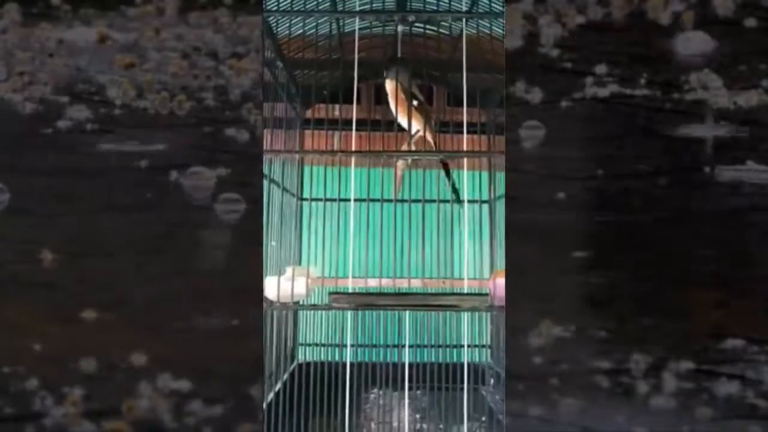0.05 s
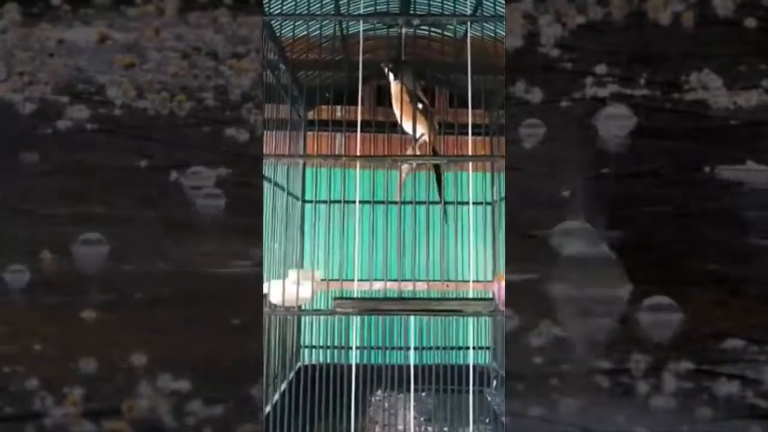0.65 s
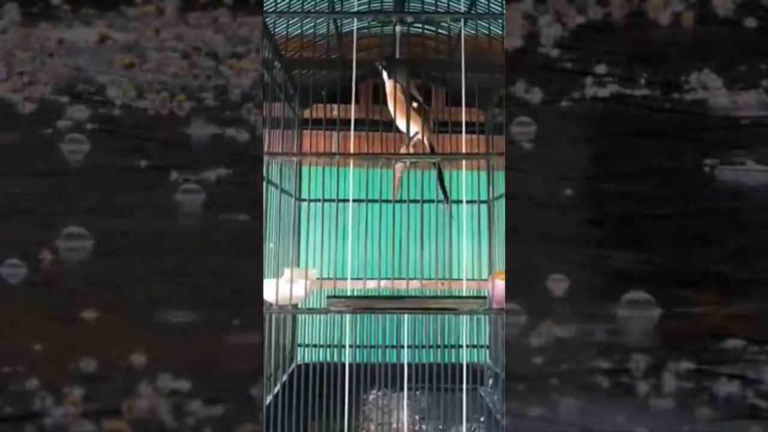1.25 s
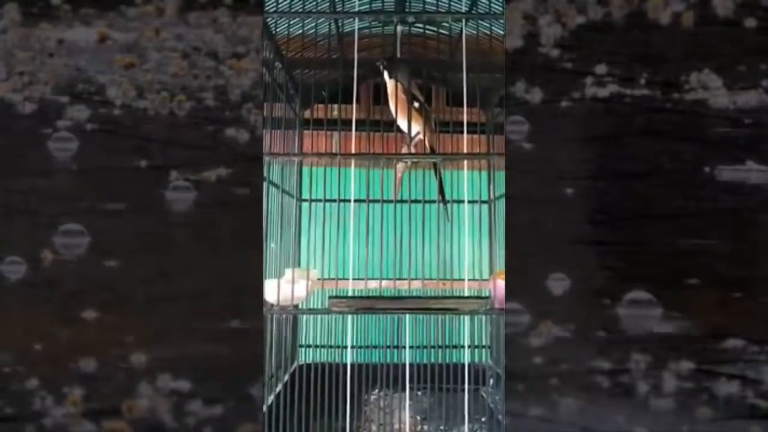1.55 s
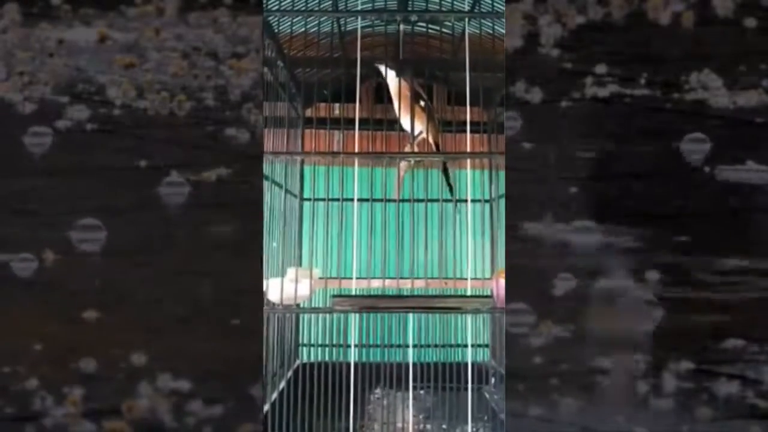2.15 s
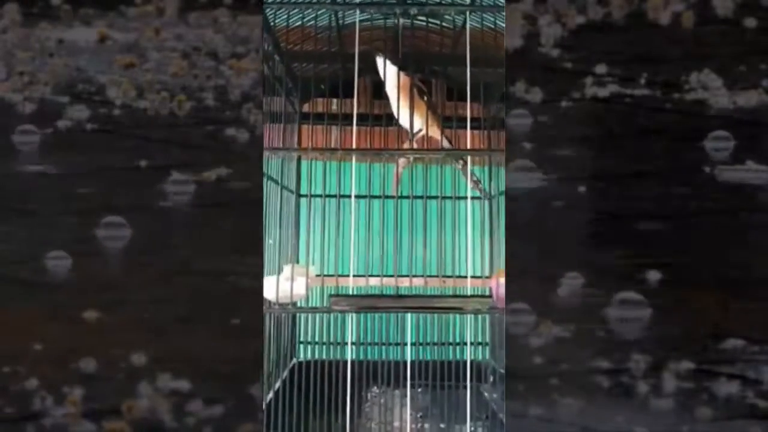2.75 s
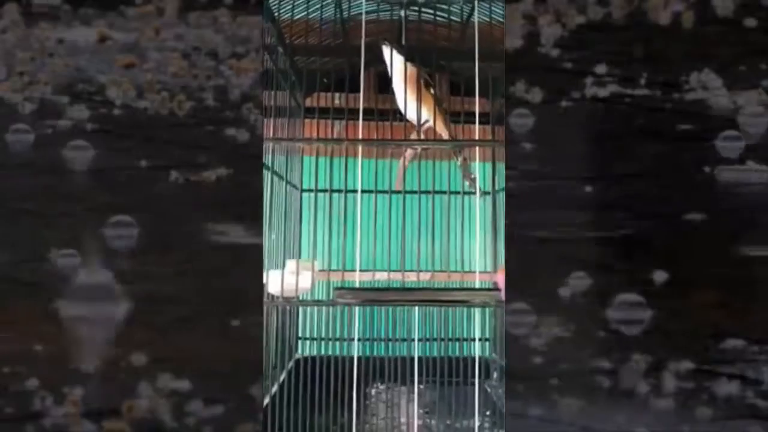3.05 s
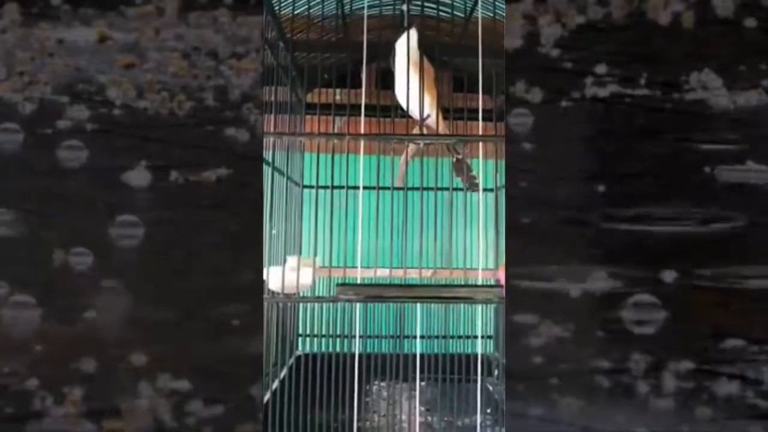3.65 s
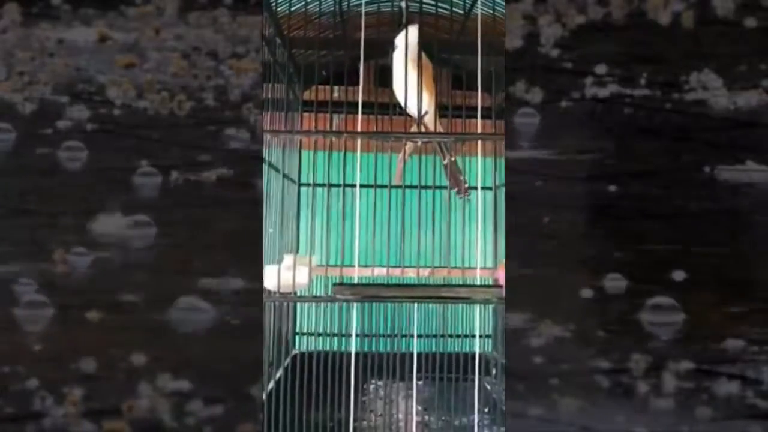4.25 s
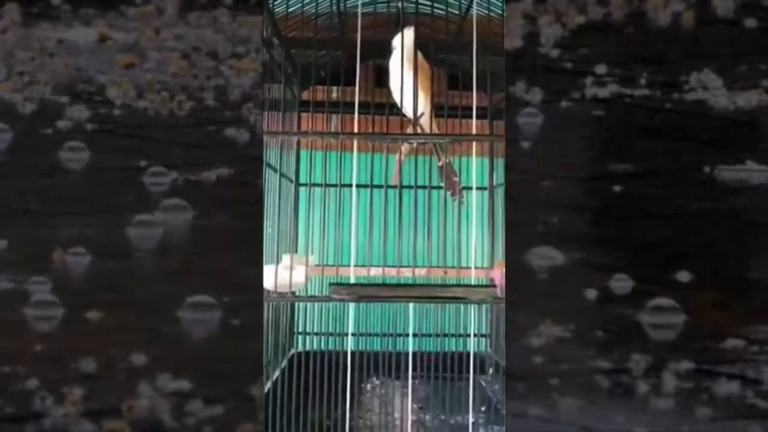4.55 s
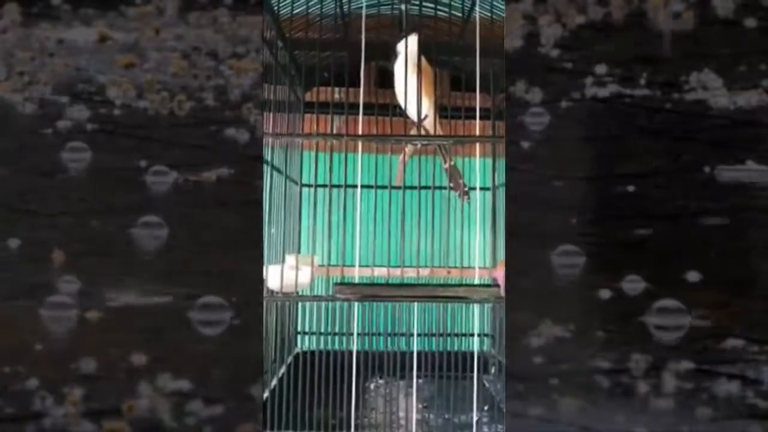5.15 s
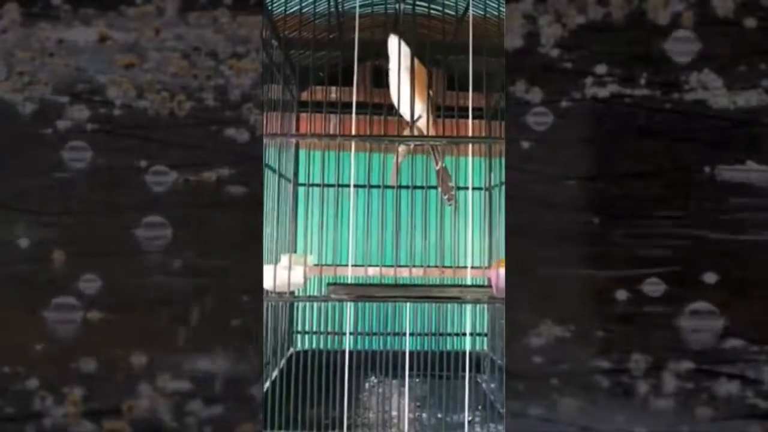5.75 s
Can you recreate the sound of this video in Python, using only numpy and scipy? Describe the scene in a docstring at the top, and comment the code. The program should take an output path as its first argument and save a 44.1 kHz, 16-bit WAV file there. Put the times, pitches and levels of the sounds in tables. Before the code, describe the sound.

Close, loud birdsong from a cage, switching quickly between screeches, chirp runs, whistles and a rolling trill, with a soft outdoor wash behind.

```python
"""Caged shrike, close up

A shrike sings loudly at the microphone: harsh screeches trailed by dry rasps, runs of arched chirps,
falling whistles and a rolling trill of sharp chips. Its voice roughens with turbulent air and splits
into extra lines as its cycles alternate. Nearby walls throw the song back over a steady outdoor wash,
and the loudest notes overload the recorder."""
import sys
import numpy as np
from scipy import signal
from scipy.fft import rfft, irfft
from scipy.io import wavfile
from scipy.ndimage import uniform_filter1d

SR = 44100
rng = np.random.default_rng(int(sys.argv[2]) if len(sys.argv) > 2 else 0)


def dump_mix(stems):
    """Bounce the given channels to the path in sys.argv[1] as a 16-bit WAV at rate SR."""
    frames = np.atleast_2d(stems).T  # one column per channel
    limited = np.clip(frames, -1, 1)  # hard clip at full scale
    pcm = np.round(limited * 32767).astype(np.int16)
    wavfile.write(sys.argv[1], SR, pcm)


N = 264600

# Colour of the outdoor wash. Each row: frequency in Hz, noise density in dB.
WASH_COLOUR = [(25, -46), (60, -10.5), (130, -14.5), (185, 1.5), (330, 1), (600, -2.5), (1000, -0.5),
               (1600, 2.5), (2500, 4.5), (3300, 1), (4700, -9.5), (8000, -16.5), (14000, -19.5),
               (15500, -22)]
# Stereo width of the wash. Each row: frequency in Hz, left-right likeness from 0 to 1.
WASH_LIKENESS = [(50, 0.74), (200, 1), (400, 0.8), (800, 0.28), (2000, 0.056), (10000, 0.41)]
# Fader rides on the wash. Each row: time in seconds, roar and hiss in dB before their trims.
WASH_RIDES = [(0.0, -31, -30), (0.35, -31, -28.5), (0.8, -32.5, -37), (1.52, -33, -38), (1.92, -36, -40),
              (3.06, -34.5, -40), (3.48, -36, -43), (4.16, -37, -43), (5.48, -30.5, -33.5),
              (6.0, -28.5, -31)]
# Screeches. Each row: start, length and attack in seconds, level in dB, time to the break in seconds,
# level after it in dB, start and end pitch in Hz, roughness from 0 to 1, quarter lines before it in dB.
SCREECH_NOTES = [ (.020, 0.15, 0.023, -4.5, 0.08, -14.5, 4030, 4810, 0.57, -5.5),
                 (.603, 0.16, 0.022, -3, 0.083, -16, 3927, 4666, 0.31, -11),
                 (1.895, 0.084, 0.041, -7, 0.11, 1, 3610, 5184, 0.72, -6),
                 (3.946, .140, 0.031, 0, 0.068, -13, 4073, 4813, 0.47, -10.5),
                 (4.530, .150, 0.019, -2.5, 0.071, -12.5, 3950, 4757, 0.32, -12),
                 (4.964, .165, 0.024, -.5, 0.084, -15.5, 3960, 4730, 0.3, -13.5)]
# Dry rasps. Each row: start and length in seconds, level in dB, pitch of the fifth line in Hz.
RASP_NOTES = [ (.192, 0.047, -15, 5530), (.318, 0.04, -11.5, 5540), (.762, 0.047, -17.5, 5380),
              (.797, 0.022, -14, 5120), (.861, 0.033, -12.5, 5400), (2.349, 0.028, -15.5, 5350),
              (2.576, 0.022, -14.5, 5500), (4.122, 0.042, -11.5, 6250), (4.24, 0.0504, -12, 5886),
              (4.698, 0.059, -15, 5410), (4.787, 0.036, -11, 5805), (5.145, 0.038, -14.5, 6270),
              (5.229, 0.041, -13.5, 5740)]
# Chirps. Each row: start and length in seconds, level in dB, top pitch in Hz, relative roughness.
CHIRP_NOTES = [ (1.025, 0.0101, -11.5, 4780, 0.25), (1.031, 0.0097, -13, 3930, 0.4),
               (1.209, 0.015, -8, 4640, 0.25), (1.269, 0.023, -10.5, 4584, .3),
               (1.335, 0.021, -9.5, 4520, 0.07), (1.396, 0.025, -15, 4380, 0.35),
               (1.463, 0.023, -9.5, 4400, 0.16), (1.525, 0.03, -14, 4034, 0.53),
               (1.592, 0.03, -16, 3770, 0.3), (1.657, 0.042, -23, 3206, .7),
               (2.057, 0.026, -12, 3780, 0.13), (2.652, 0.028, -15.5, 4250, 0.39),
               (2.726, 0.019, -10.5, 4363, 0.37), (2.792, 0.024, -9, 4437, 0.26),
               (2.86, 0.014, -5, 4040, 0.24), (2.929, 0.016, -6.5, 4140, .3),
               (5.393, 0.021, -12, 3930, 0.68), (5.608, 0.0177, -9, 4750, 0.14),
               (5.683, 0.011, -6, 4670, 0.14), (5.748, 0.015, -8, 4515, 0.14),
               (5.815, 0.018, -6.5, 4520, 0.16), (5.879, 0.018, -8, 4320, 0.24),
               (5.948, 0.025, -12, 4150, 0.14)]
# Whistles. Each row: start, length and attack in seconds, level in dB, start and resting pitch in Hz,
# fall time in seconds, opening roughness from 0 to 1.
WHISTLE_NOTES = [ (1.056, 0.097, 0.012, -11, 3650, 3173, .016, 0.42),
                 (2.185, 0.13, 0.037, -5, 5996, 3240, .034, 0.44),
                 (2.436, 0.11, 0.031, -7, 5780, 2680, 0.034, 0.71),
                 (5.422, 0.068, 0.0079, -8.5, 3490, 3256, 0.0292, 0.41)]
# Chips of the trill. Each row: start and length in seconds, level in dB, pitch near the bottom of
# the dip and end pitch in Hz, opening roughness from 0 to 1.
TRILL_NOTES = [ (3.006, 0.014, -4, 3380, 4660, 0.68), (3.080, 0.02, -1, 3570, 4760, 0.34),
               (3.161, 0.022, -2.5, 3520, 4850, 0.49), (3.242, 0.023, -3, 3580, 4900, 0.51),
               (3.324, .025, -3, 3680, 5000, 0.54), (3.405, 0.017, -2, 3936, 5070, 0.53),
               (3.490, .023, -2.5, 3600, 5110, 0.55), (3.569, 0.02, -1.5, 3680, 5000, 0.55),
               (3.657, 0.019, -2, 3654, 5046, 0.81), (3.763, 0.0151, -6, 3557, 4135, 0.56)]
# The voice's overtones, then the lines from cycles alternating in twos, and in fours and eights.
# Each row: multiple of the pitch, relative level in dB.
OVERTONE_PARTIALS = [(2, -18.5), (3, -25.5)]
HALF_PARTIALS = [(1 / 2, 7), (3 / 2, -3.6)]
QUARTER_PARTIALS = [(3 / 4, 0), (7 / 8, -2), (5 / 4, -6), (7 / 4, -18), (5 / 2, -30), (11 / 4, -28)]
# What windpipe and beak pass of each partial. Each row: frequency in Hz, gain in dB.
TRACT_EQ = [(1500, -12), (2000, 0), (2350, 9.5), (2800, 4), (3500, 3), (4400, 6), (5400, 14), (6500, -1),
            (8000, 5), (9500, -6), (12000, 11.5), (15500, -22)]
# Turbulent air in the throat, and with the beak wide. Each row: frequency in Hz, noise density in dB.
THROAT_COLOUR = [(1000, -75), (1700, -31), (1920, -60), (2290, -63), (2510, 9.5), (2830, 5.5), (3500, 7),
                 (3770, -5), (4050, 6.5), (4700, 7), (5710, 4), (7530, 0), (9580, -8.5), (12400, -8.5),
                 (15500, -13.5)]
BEAK_COLOUR = [(940, -14), (1600, -1), (2010, 1), (2230, 4.5), (2830, -5.5), (3390, 0), (3950, 4),
               (4510, 7), (5250, 6.5), (5610, 12.5), (6350, 5), (7600, -10.5), (14500, -15), (15500, -38)]
# Slaps off near surfaces. Each row: delay in milliseconds, left gain, right gain.
WALL_SLAPS = [(1.904, 0.39, -0.0038), (3.6766, -0.13, 0.86), (6.301, 0.6, -0.083), (8.36, 0.25, -0.15),
              (11.82, -0.3, 0.22), (16.5, 0.17, -0.053), (23.88, 0.17, 0.0014)]
# Ring of the surroundings. Each row: frequency in Hz, seconds to fall by 60 dB.
TAIL_DECAY = [(500, 0.11), (3000, 0.72), (5000, 0.55), (8000, 0.58), (14000, 0.49)]
# Stereo lean of the song. Each row: frequency in Hz, left minus right level in dB.
SONG_PAN = [(2200, 0), (3200, 1.4), (4500, 2), (7500, -1.2), (9000, -.5), (12000, -2.5)]

BAND_LIMIT_HZ = 15700


def amp(db):
    """Decibels to gain."""
    return 10 ** (np.asarray(db) / 20)


def unit_rms(x):
    """Scales to rms 1."""
    return x / np.sqrt(np.mean(x ** 2) + 1e-20)


def curve_at(points, hz):
    """Reads a (Hz, value) table on a log-frequency axis."""
    f, value = np.transpose(points)
    return np.interp(np.log(hz + 1), np.log(f + 1), value)


def add(mix, start, sound):
    """Mixes a sound in at its start in seconds."""
    part = mix[round(start * SR):][:len(sound)]
    part += sound[:len(part)]


def coloured_noise(colour, size):
    """Noise of rms 1 with the given spectrum."""
    gain = amp(curve_at(colour, np.fft.rfftfreq(16384, 1 / SR)))
    return unit_rms(irfft(rfft(rng.standard_normal(16384)) * gain)[:size])


def wobble(top_hz, size):
    """Smooth random motion, rolled off above top_hz."""
    rolloff = 1 + (np.fft.rfftfreq(16384, 1 / SR) / top_hz) ** 4
    return unit_rms(irfft(rfft(rng.standard_normal(16384)) / rolloff))[:size]


def note_shape(t, attack_s, onset_db, release_s):
    """A soft start, a swell from onset_db to full level, and a release."""
    edges = np.clip(np.minimum(t / 0.001, (t[-1] - t) / release_s), 0, 1)
    return edges * amp(onset_db * np.maximum(1 - t / attack_s, 0))


def outdoor_wash(roar_trim_db=1, hiss_trim_db=6.5, split_hz=850):
    """The distant outdoor bed: a low roar and a wider hiss, each drifting slowly in level."""
    frames, hz = N // 256 + 5, np.fft.rfftfreq(1024, 1 / SR)
    a, b, c, d, patches = rng.standard_normal((frames, len(hz), 5)).T
    likeness = np.clip(curve_at(WASH_LIKENESS, hz), -1, 1)[:, None]
    left = a + 1j * b
    right = likeness * left + np.sqrt(1 - likeness ** 2) * (c + 1j * d)
    patches = uniform_filter1d(uniform_filter1d(patches, size=14, axis=0), size=4, axis=1)
    colour = amp(curve_at(WASH_COLOUR, hz)[:, None] + 2.2 * unit_rms(patches))
    noise = signal.istft(np.array([left, right]) * colour, nperseg=1024, noverlap=768)[1][:, :N]
    low = signal.sosfiltfilt(signal.butter(2, split_hz, fs=SR, output="sos"), noise)
    times, roar_db, hiss_db = np.transpose(WASH_RIDES)
    t = np.arange(N) / SR
    roar = unit_rms(low) * amp(roar_trim_db + np.interp(t, times, roar_db))
    hiss = unit_rms(noise - low) * amp(hiss_trim_db + np.interp(t, times, hiss_db))
    return roar + hiss


def syrinx(hz, rough, half_db, bright_db, air, jitter, jitter_hz=650, quarter_db=None,
           flutter=0.52, flutter_hz=450):
    """The voice: a tone, overtones and lines of alternating cycles; roughness shakes it and adds air."""
    size, rough = len(hz), np.clip(rough, 0, 1)
    phase = 2 * np.pi * np.cumsum(hz * (1 + jitter * rough * wobble(jitter_hz, size))) / SR
    families = [([(1, 0)], 0), (OVERTONE_PARTIALS, bright_db), (HALF_PARTIALS, half_db)]
    if quarter_db is not None:
        families.append((QUARTER_PARTIALS, quarter_db))
    tone = np.zeros(size)
    for lines, family_db in families:
        for k, db in lines:
            beak_db = bright_db if 1 < k < 2 else 0  # a wider beak lets the upper lines out as well
            gain = amp(db + family_db + beak_db + curve_at(TRACT_EQ, k * hz))
            tone += gain * np.sin(k * phase) * (k * hz < BAND_LIMIT_HZ)
    air_share = np.clip(air * rough ** 2, 0, 1)
    breath = np.sqrt(air_share) * coloured_noise(THROAT_COLOUR, size)
    voice = np.sqrt(1 - air_share) * unit_rms(tone) + breath
    return unit_rms(voice * np.exp(flutter * rough * wobble(flutter_hz, size)))


def beak_notches(voice):
    """In harsh notes the open beak cancels two bands, setting the main lines apart."""
    for hz, width_hz in ((2800, 450), (5500, 1100)):
        voice = signal.lfilter(*signal.iirnotch(hz, hz / width_hz, fs=SR), voice)
    return unit_rms(voice)


def screech(start, length, attack_s, db, break_s, hoarse_db, start_hz, end_hz, rough, quarter_db,
            sag_db_per_s=84, crack_s=0.0085):
    """A rising tone swells, sags and can break into a hoarse stack of lines a quarter-pitch apart."""
    t = np.arange(0, length, 1 / SR)
    glide_hz = start_hz + (end_hz - start_hz) * (t / length) ** 0.9
    hz = glide_hz * (1 + 0.0094 * wobble(70, len(t)))
    past_break = (t - break_s) / crack_s
    broken = (1 + np.tanh(past_break)) / 2
    clear_db = db - sag_db_per_s * np.maximum(t - attack_s, 0)
    dip_db = -2 * np.exp(-past_break ** 2)
    level_db = clear_db + (hoarse_db - clear_db) * broken + dip_db
    split_db = quarter_db + (5 - quarter_db) * broken
    voice = syrinx(hz, rough + 0.15 * broken, half_db=-22.5, bright_db=-2.5, air=0.35, jitter=0.045,
                   jitter_hz=920, quarter_db=split_db, flutter=0.67, flutter_hz=453)
    swell = amp(level_db) * note_shape(t, attack_s, onset_db=-19.5, release_s=0.019)
    return start, swell * beak_notches(voice)


def rasp(start, length, db, hz, jitter=0.0379, jitter_hz=700, grain=0.27, grain_hz=400):
    """A shaky, grainy stack of lines and breath through the wide beak."""
    size = int(length * SR)
    progress = np.arange(size) / size
    base_hz = hz / 5
    bend = 0.98 + 0.04 * progress + jitter * wobble(jitter_hz, size)
    phase = 2 * np.pi * np.cumsum(base_hz * bend) / SR
    lines = sum(amp(curve_at(BEAK_COLOUR, k * base_hz)) * np.sin(k * phase + 2 * np.pi * rng.random())
                for k in range(2, 14))
    voice = unit_rms(lines) + coloured_noise(BEAK_COLOUR, size)
    voice *= np.exp(grain * wobble(grain_hz, size))
    return start, amp(db) * unit_rms(voice) * np.sin(np.pi * progress) ** 0.4


def time_in_run(starts, pause_s=0.12):
    """For each note, the seconds since the last pause ended."""
    after_pause = np.diff(starts, prepend=-np.inf) > pause_s
    return starts - np.maximum.accumulate(starts * after_pause)


def chirp(start, length, db, top_hz, rough, in_run_s, crest=0.701, attack=0.34, release=0.9,
          lead_s=0.0077, lead_db=-15, typical_db=-11.5, typical_hz=4570):
    """After a faint hoarse lead-in the pitch arches up and over, most often clearing as it rises."""
    t = np.arange(-lead_s, length, 1 / SR)
    progress = np.maximum(t / length, 0)
    # Softer chirps sweep less and split more into half lines.
    accent_db = db - typical_db
    sweep = 0.12 * amp(accent_db) ** 0.573
    half_db = -11.5 - accent_db
    hz = top_hz * (1 - sweep * (1 - progress / crest) ** 2)
    # High chirps are brightest; the beak closes as the run goes on.
    bright_db = 7.5 + 33 * np.log2(top_hz / typical_hz) - 31.5 * in_run_s
    lead_in = amp(lead_db) * np.minimum(1 + t / lead_s, 1)
    rise = np.maximum(np.sin(np.pi / 2 * np.minimum(progress / attack, 1)), lead_in)
    fall = np.sin(np.pi / 2 * np.minimum((1 - progress) / release, 1))
    shake = np.interp(progress, [0, 0.2, 1], [0.7, 1.35 * rough, 1.05 * rough])
    voice = syrinx(hz, shake, half_db, bright_db, air=0.1, jitter=0.104)
    return start - lead_s, amp(db) * rise * fall * voice


def whistle(start, length, attack_s, db, start_hz, rest_hz, fall_s, rough,
            warble=0.0352, warble_hz=150, settled_rough=0.22, fade_db_per_s=99):
    """A warbling, rough-edged tone falls onto a resting pitch, clearing and fading as it settles."""
    t = np.arange(0, length, 1 / SR)
    height = np.exp(-(t / fall_s) ** 2)
    hz = (rest_hz + (start_hz - rest_hz) * height) * (1 + warble * wobble(warble_hz, len(t)))
    shake = settled_rough + (rough - settled_rough) * height
    fade = amp(db - fade_db_per_s * np.maximum(t - attack_s, 0))
    voice = syrinx(hz, shake, half_db=-37, bright_db=-1.5, air=0.18, jitter=0.15,
                   flutter=0.9, flutter_hz=294)
    return start, fade * note_shape(t, attack_s, onset_db=-18, release_s=0.015) * voice


def chip(start, length, db, dip_hz, end_hz, rough):
    """A hard start and a quick pitch dip, then an upward flick in which the voice splits and fades."""
    progress = np.arange(int(length * SR)) / (length * SR)
    hz = np.interp(progress, [0, 0.27, 0.55, 1], [1.2 * dip_hz, 0.96 * dip_hz, end_hz, end_hz])
    shake = rough * np.interp(progress, [0, 0.15, 0.45], [1, 0.45, 0.85])
    swell = np.interp(progress, [0, 0.15, 0.33, 0.65, 1], [0.15, 0.98, 0.84, 0.37, 0])
    split_db = np.interp(progress, [0.3, 0.55], [-20, -4])
    voice = syrinx(hz, shake, half_db=split_db - 9, bright_db=-4, air=0.21, jitter=0.14,
                   jitter_hz=810, quarter_db=split_db)
    return start, amp(db) * swell * beak_notches(voice)


def wall_echoes(song, lag_ms=0.273, scatter_db=-7, scatter_s=0.11, tail_db=-16):
    """The song reaches the right microphone first; near slaps, quick scatter and a faint tail follow."""
    size = SR // 2
    t, hz = np.arange(size) / SR, np.fft.rfftfreq(size, 1 / SR)
    paths = np.array([np.exp(-2j * np.pi * hz * lag_ms / 1000), np.ones(len(hz))])
    for ms, left, right in WALL_SLAPS:
        paths += np.array([[left], [right]]) * np.exp(-2j * np.pi * hz * ms / 1000)
    taps = rng.standard_normal((2, 2, size)) * (rng.random((2, 2, size)) < 0.1) * (t > 0.003)
    scatter = taps[0] * amp(-60 * t / scatter_s)
    band_hz, frame_s, bands = signal.stft(taps[1], SR, nperseg=256)
    decay = amp(-60 * frame_s / curve_at(TAIL_DECAY, band_hz)[:, None])
    tail = signal.istft(bands * decay, SR, nperseg=256)[1][:, :size]
    # The highest partials beam past the microphone and return by the walls.
    diffuse_db = curve_at([(2000, 6.1), (4000, 2.4), (6000, 1.3), (9000, 9.3)], hz)
    for db, part in ((scatter_db, scatter), (tail_db, tail)):
        paths += amp(db + diffuse_db) * rfft(part / np.linalg.norm(part[0]))
    pan_db = curve_at(SONG_PAN, hz)
    paths *= amp(np.array([pan_db, -pan_db]) / 2)
    lead = 256  # samples of pre-roll keep the direct sound's attack whole
    response = np.roll(irfft(paths), lead, axis=1)
    return signal.fftconvolve(song[None], response, axes=1)[:, lead:lead + N]


def scene():
    """The bird and its echoes over the outdoor wash."""
    song = np.zeros(N)
    for row, in_run_s in zip(CHIRP_NOTES, time_in_run(np.array(CHIRP_NOTES)[:, 0])):
        add(song, *chirp(*row, in_run_s))
    for table, note in ((SCREECH_NOTES, screech), (RASP_NOTES, rasp),
                        (WHISTLE_NOTES, whistle), (TRILL_NOTES, chip)):
        for row in table:
            add(song, *note(*row))
    return amp(-0.5) * wall_echoes(song) + outdoor_wash()


def record(dry, bend=0.21, thud_band_hz=(78, 450)):
    """Lopsided recorder overload puts low thuds under loud notes; peaks flatten; the top is cut off."""
    thuds = signal.sosfilt(signal.butter(1, thud_band_hz, "bandpass", fs=SR, output="sos"), dry ** 2)
    bent = dry + bend * thuds
    clipped = bent / (1 + bent ** 8) ** (1 / 8)
    lowpass = signal.firwin(511, BAND_LIMIT_HZ, window=("kaiser", 9), fs=SR)
    return signal.oaconvolve(clipped, lowpass[None], "same")


dry = scene()
out = record(dry)
dump_mix(out)
```